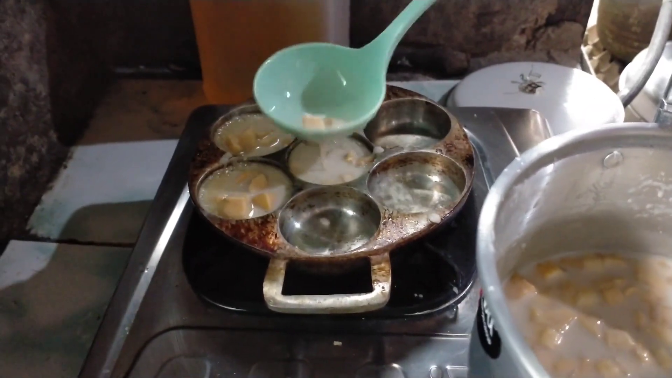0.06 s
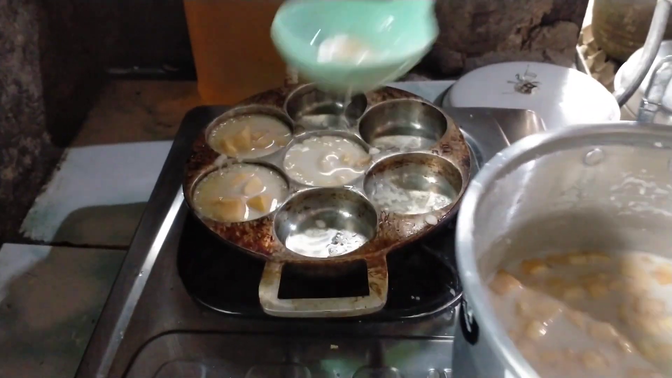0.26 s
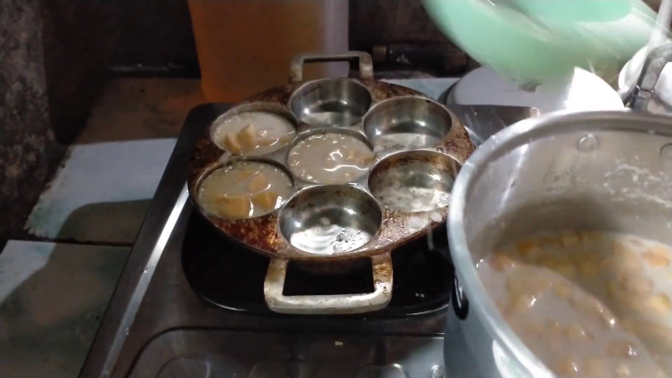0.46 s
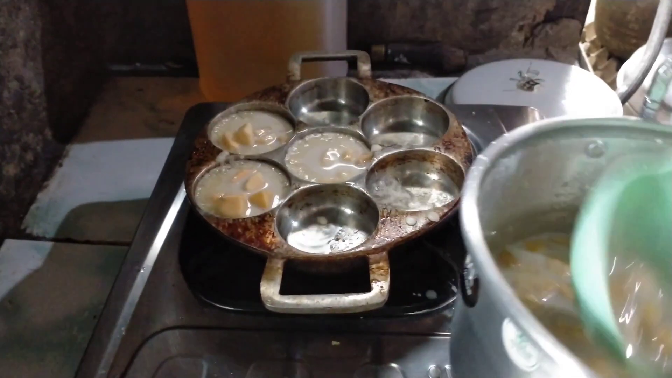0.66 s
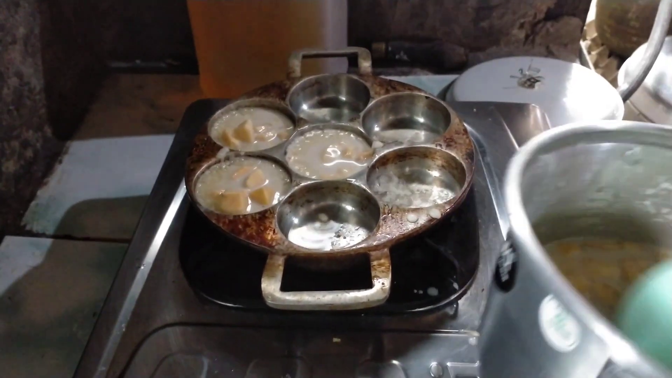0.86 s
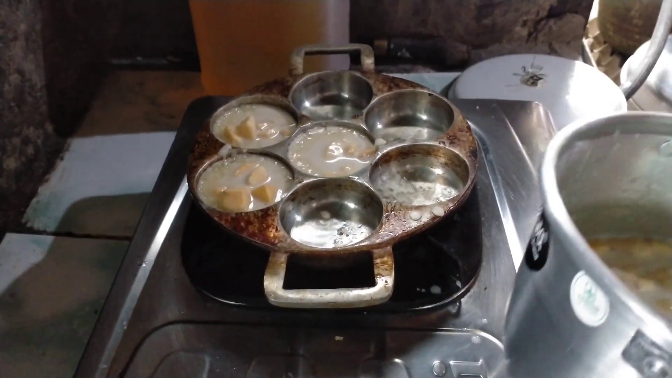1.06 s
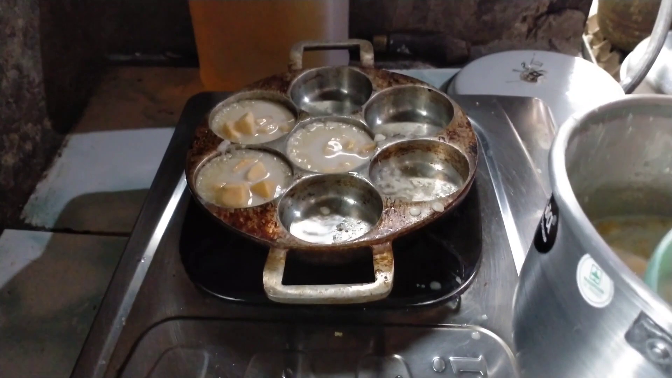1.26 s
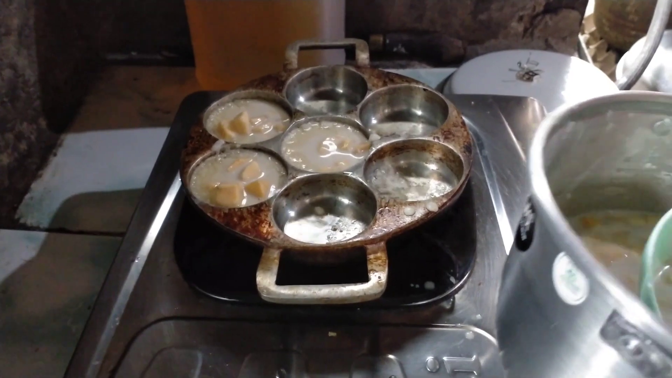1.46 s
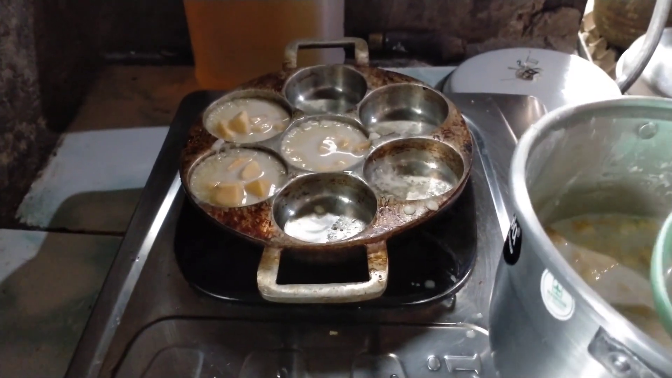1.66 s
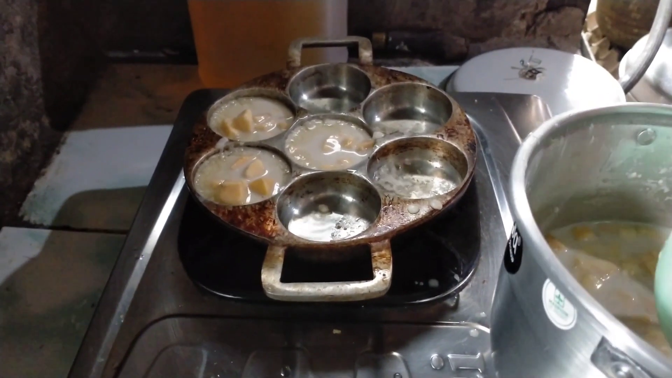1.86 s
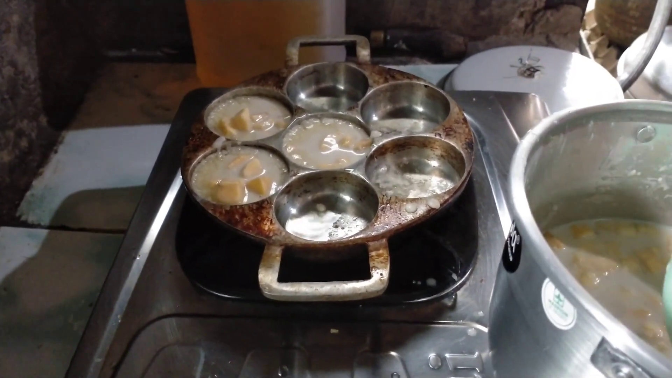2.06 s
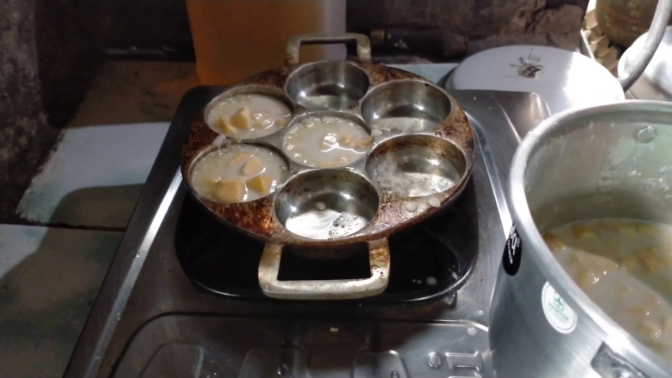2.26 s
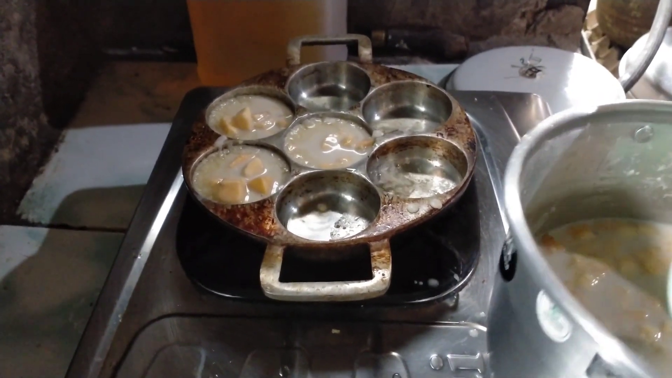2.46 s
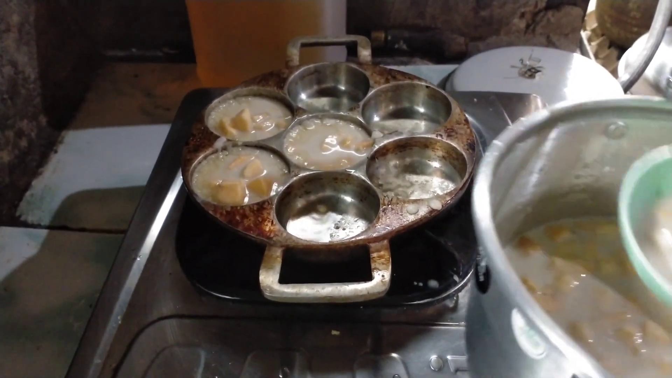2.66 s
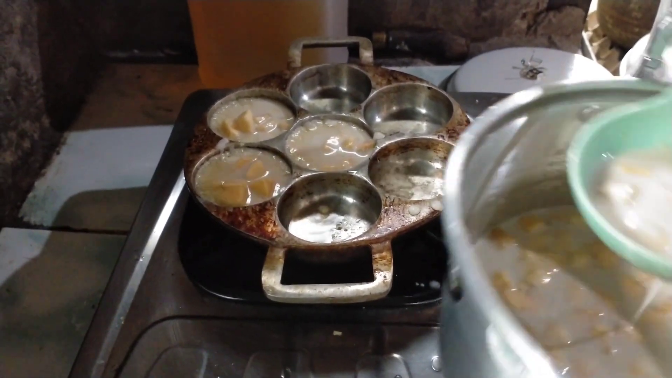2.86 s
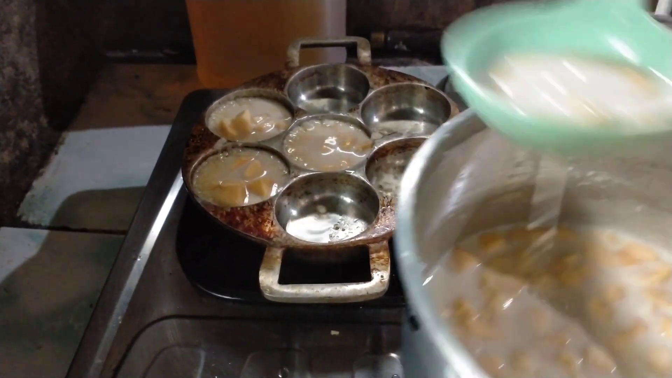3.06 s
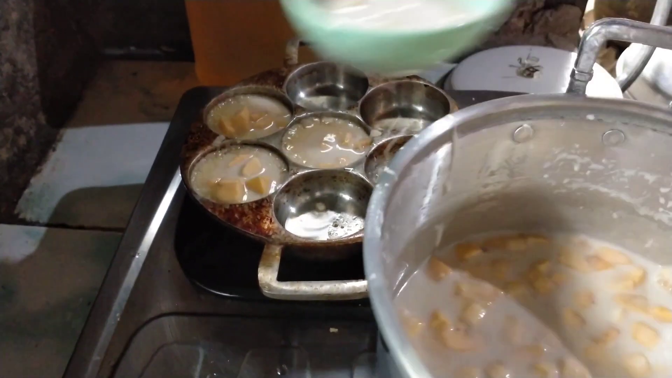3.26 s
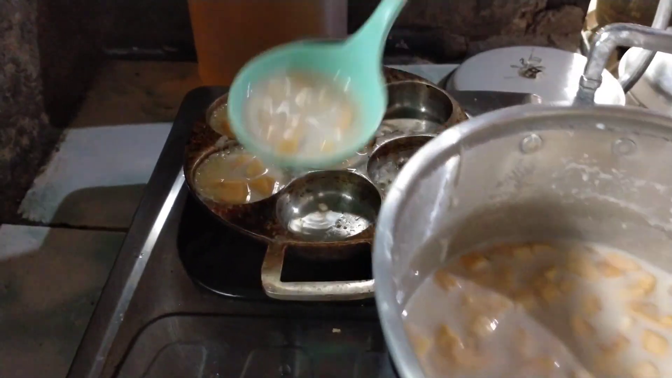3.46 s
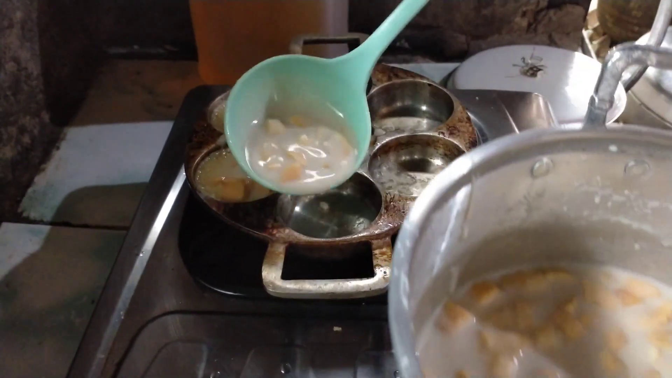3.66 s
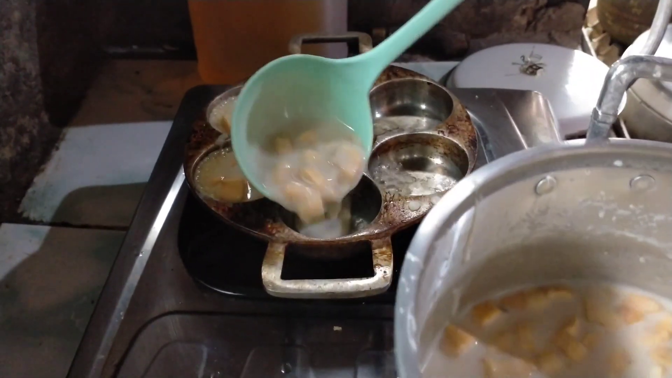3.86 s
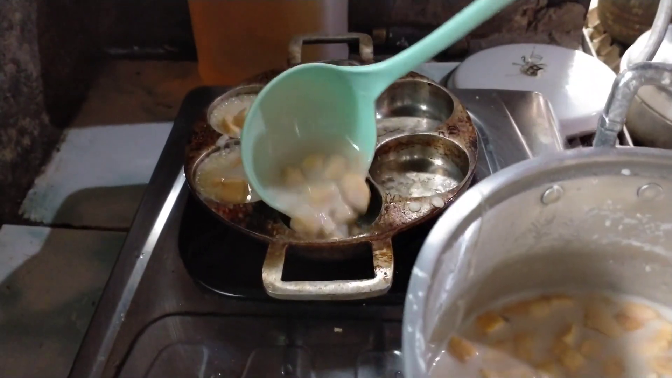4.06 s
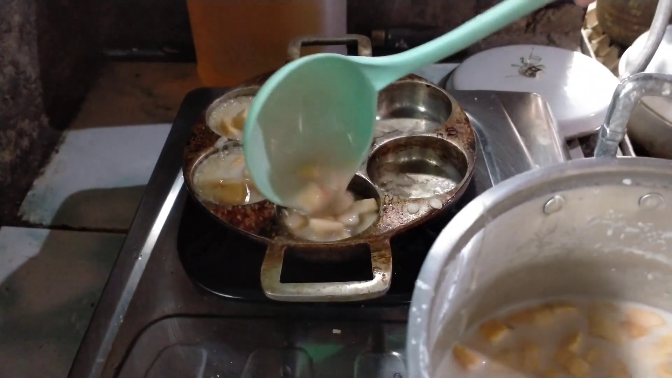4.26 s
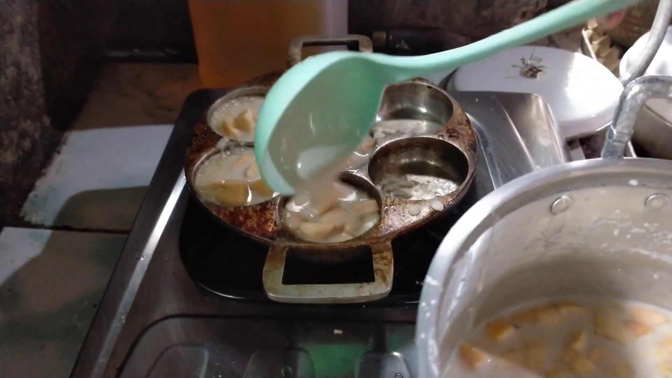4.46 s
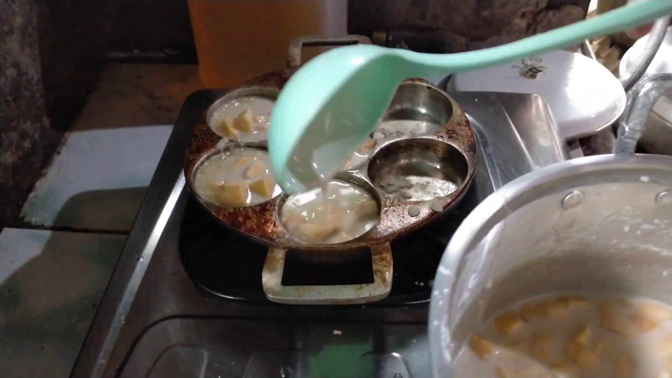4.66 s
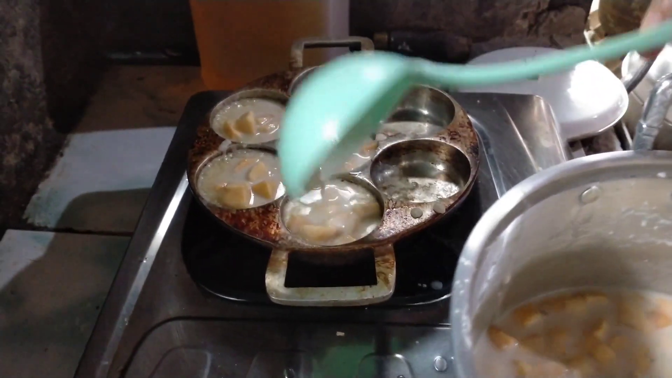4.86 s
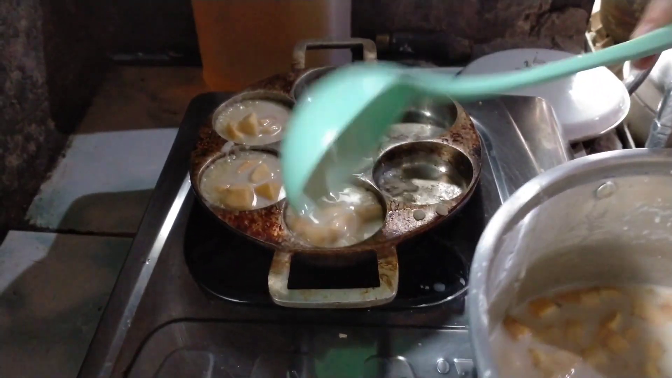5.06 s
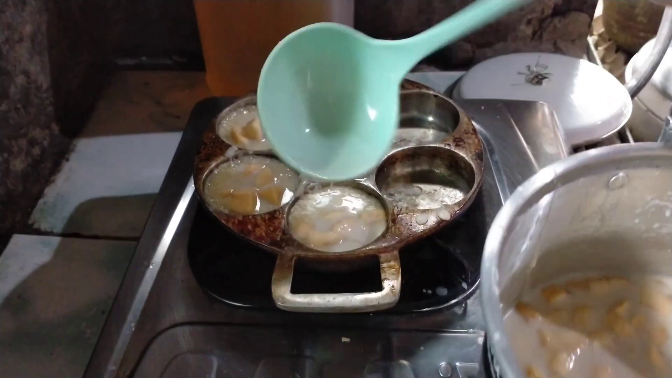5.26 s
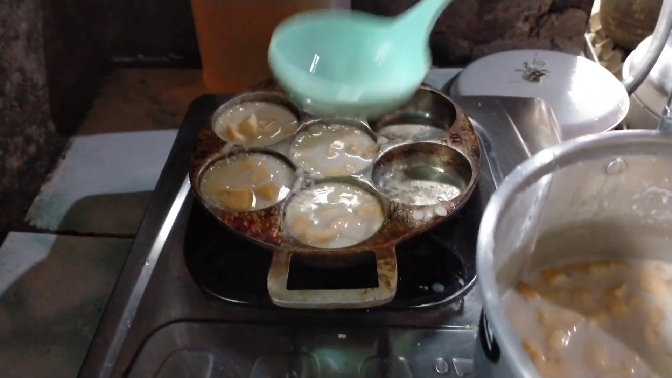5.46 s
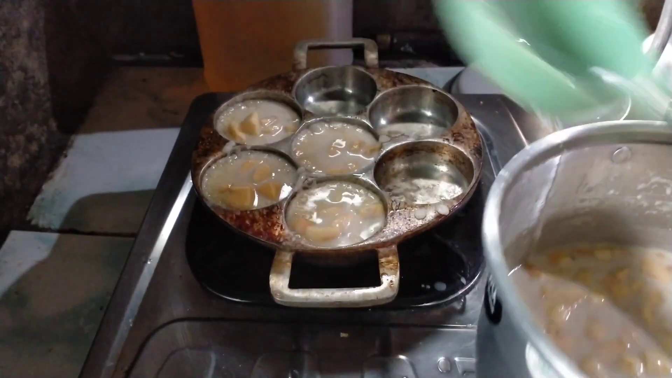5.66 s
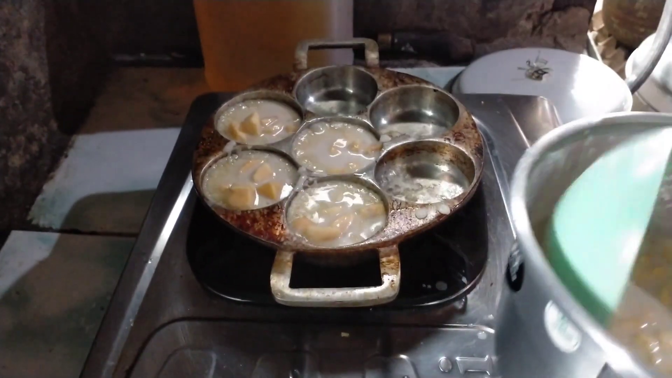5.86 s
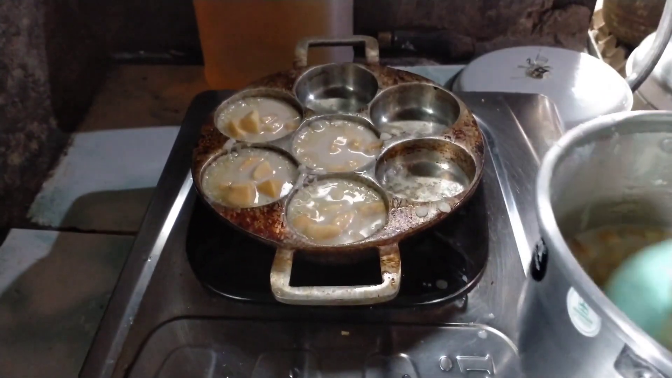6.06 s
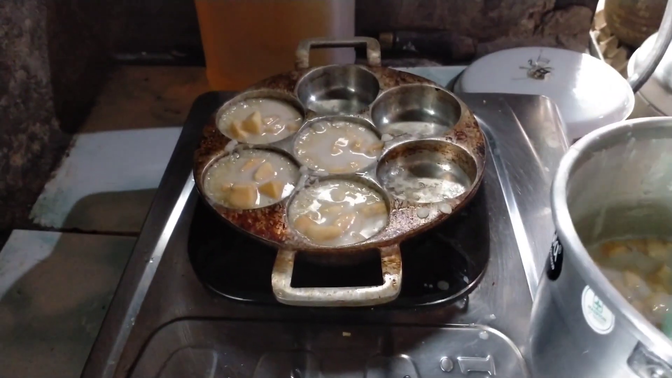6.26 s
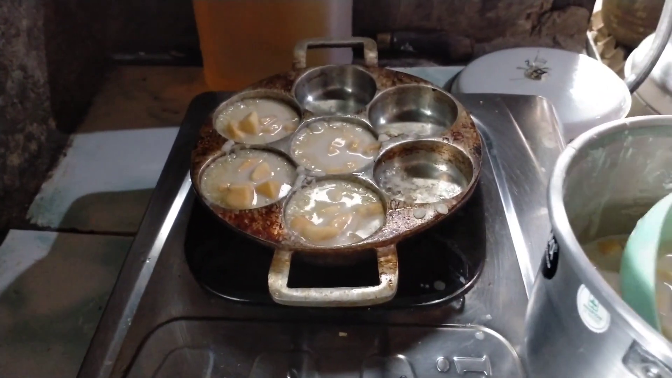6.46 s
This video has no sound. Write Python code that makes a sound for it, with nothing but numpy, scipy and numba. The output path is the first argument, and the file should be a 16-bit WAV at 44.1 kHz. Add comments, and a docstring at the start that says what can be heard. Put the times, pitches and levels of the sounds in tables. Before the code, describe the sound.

Bright frying hiss dies to scattered spits; a new pour sears loudly with a soft knock, bubbles hard, then settles in a kitchen.

```python
"""A kitchen, a little way from a mono microphone: batter is already frying in the oiled cups of a hot metal
mould, over a low rumble and a distant hum that swells once. Random steam bursts in flurries, filtered by bubble
size, make the sizzle; blisters pop as short rung noise, and among them single drops spit as clusters of clicks.
From 3.4 s new layers of frying set in; a ladle knocks (damped modes), a dollop slaps in, surges flash into steam.
From 4 s the filled front cup rings with its own bubbling, then settles as the frying dies down."""
import sys
import numpy as np
from scipy import signal
from scipy.fft import rfft, irfft
from scipy.io import wavfile
from numba import njit

SR = 44100
rng = np.random.default_rng(int(sys.argv[2]) if len(sys.argv) > 2 else 0)


def generate_wav(sig):
    """Save sig (samples, or channels by samples) to the path in sys.argv[1] as 16-bit PCM at SR."""
    pcm = np.round(np.clip(np.atleast_2d(sig).T, -1, 1) * 32767).astype(np.int16)
    wavfile.write(sys.argv[1], SR, pcm)


N = 287091
TIME = np.arange(N) / SR


def undb(db):
    """Decibels to amplitude."""
    return 10 ** (np.asarray(db) / 20)


def unit(x):
    """Scale to rms 1."""
    return x / np.sqrt(np.mean(x ** 2))


def add(out, s, sound):
    """Mix a short sound in at s seconds."""
    room = out[int(s * SR):][:len(sound)]
    room += sound[:len(room)]


def envelope(age, attack_s, hold_s, release_s):
    """Straight rise, level until hold_s after the start, then an exponential fall."""
    rise = np.clip(age / attack_s, 0, 1)
    return rise * np.exp(-np.maximum(age - hold_s, 0) / release_s)


def puff(rise_s, decay_s):
    """Envelope of one small explosion of steam."""
    age = np.arange(SR // 10) / SR
    return (1 - np.exp(-age / rise_s)) * np.exp(-age / decay_s)


def walk(rate):
    """Random wander of rms 1, heading for a new value rate times a second."""
    return unit(np.interp(TIME * rate, np.arange(2048), rng.standard_normal(size=2048)))


def colour(x, points, size=16384):
    """Minimum-phase filter with the given (Hz, dB) outline, falling 20 dB per octave outside it."""
    hz, db = np.transpose(points)
    bins = np.maximum(np.arange(size // 2 + 1) * SR / size, 1)
    octaves_below = np.maximum(np.log2(hz[0] / bins), 0)
    octaves_above = np.maximum(np.log2(bins / hz[-1]), 0)
    outline_db = np.interp(np.log(bins), np.log(hz), db) - 20 * (octaves_below + octaves_above)
    # folding the cepstrum forward in time makes the filter causal
    cepstrum = irfft(np.log(undb(outline_db)))
    cepstrum[1:size // 2] *= 2
    cepstrum[size // 2 + 1:] = 0
    impulse = irfft(np.exp(rfft(cepstrum)))
    return signal.fftconvolve(x, impulse)[:N]


def ring(x, hz, width_hz):
    """Fixed resonance, gain 1 at the centre."""
    return signal.lfilter(*signal.iirpeak(hz, hz / width_hz, fs=SR), x)


@njit
def resonance(x, hz, width):
    """State-variable band-pass whose centre may move."""
    y, band, low = np.empty(len(x)), 0., 0.
    for i in range(len(x)):
        g, damping = np.tan(np.pi * hz[i] / SR), width / hz[i]
        v = (band + g * (x[i] - low)) / (1 + g * (g + damping))
        band, low, y[i] = 2 * v - band, low + 2 * g * v, damping * v
    return y


def bursts(rate, spread_db):
    """Bubbles bursting at random, rate a second, with sizes spread in dB; rms 1."""
    chance, size = rng.random(N), rng.standard_normal(N)
    hit = np.flatnonzero(chance < rate / SR)
    out = np.zeros(N)
    out[hit] = (-1.) ** hit * undb(spread_db * np.minimum(size[hit], 2.6))
    return unit(out)


def flurries(rate, rise_s, decay_s):
    """Each drop that meets the oil sets off a flurry of bursts that dies quickly; mean power 1."""
    drops = rng.random(N) < rate / SR
    power = drops * (0.5 + np.minimum(rng.exponential(1, N), 3))
    for lag_s in rise_s, decay_s:
        power = signal.lfilter([1], [1, -np.exp(-1 / (lag_s * SR))], power)
    return power / power.mean()


# low rumble of the surroundings: (f/Hz, relative level/dB per Hz)
RUMBLE_SPECTRUM = [(8, 4.5), (25, 2.5), (40, -3.5), (62, -4), (85, -1.5), (112, -2), (150, -11), (220, -18),
                   (500, -31.5)]
RUMBLE_DB = -51.5
# distant hum: base level of its lower tone, swell on top, time of the peak and half length of the swell
HUM_DB, HUM_SWELL_DB, HUM_PEAK_S, HUM_SWELL_S = -61, 12, 1.22, 1.2


def surroundings():
    """Low rumble with a two-tone hum of narrow noise bands, which wavers, swells once and recedes."""
    def hum_tone(hz):
        """Noise narrowed to a wavering tone."""
        return unit(colour(rng.standard_normal(N), [(0.873 * hz, -35), (hz, 0), (1.2 * hz, -35)]))

    swell = np.exp(-((TIME - HUM_PEAK_S) / HUM_SWELL_S) ** 2)
    hum = undb(HUM_DB + HUM_SWELL_DB * swell) * (hum_tone(83) + undb(-7) * hum_tone(115))
    rumble = unit(colour(rng.standard_normal(N), RUMBLE_SPECTRUM))
    return hum + undb(RUMBLE_DB) * rumble


# overlapping layers of frying, the first two already fading at the start:
# (t/s, time to rise/s, bubbling level/dB, fine fizz level/dB, finest spray level/dB, fade of fizz and spray/dB per s)
# levels are those before fading, lulls and mixing
FRYING_LAYERS = [(-.1, .05, -31, -24.5, -27, 3), (-.1, .05, -31.5, -25, -22, 15),
                 (3.442, 0.012, -39, -32.5, -32, 1), (3.628, 0.0078, -37.5, -29, -27, 2.2),
                 (3.84, 0.2, -29, -28, -29, 2.5), (4.2, 0.03, -31, -21, -23, 6),
                 (4.47, 0.017, -48, -25, -36, 34)]
# brief lulls in the frying: (t of the middle/s, half length/s, depth/dB)
FRYING_LULLS = [(2.536, 0.032, 4), (3.197, 0.095, 1.5), (3.423, 0.018, 4.5), (6.385, 0.26, 2.5)]
# the bubbling outlasts the fizz: it fades by only this share as much
BUBBLE_FADE_SHARE = 0.88


def frying_levels():
    """Bubbling, fizz and spray in dB: overlapping layers add in power, each with its own start and fade."""
    power = 1e-9
    for s, rise_s, bubble_db, fizz_db, spray_db, fade_db_per_s in FRYING_LAYERS:
        risen = np.clip((TIME - s) / rise_s, 0, 1)
        fade_db = fade_db_per_s * np.maximum(TIME - s, 0)
        levels_db = [bubble_db - BUBBLE_FADE_SHARE * fade_db, fizz_db - fade_db, spray_db - fade_db]
        power = power + risen * undb(levels_db) ** 2
    lull_db = sum(db * np.exp(-((TIME - s) / half_s) ** 2) for s, half_s, db in FRYING_LULLS)
    return 10 * np.log10(power) - lull_db


# colours of the bursts in the cups, from the largest bubbles to the finest spray:
# (f/Hz, relative level/dB per Hz)
DEEP_SPECTRUM = [(180, -17), (250, -17.5), (303, -0.5), (345, -6.5), (420, -2), (520, -13.5), (615, 2),
                 (700, -2), (790, -1), (870, -1), (980, 0), (1120, -7.5), (1300, 2), (1700, -18.5)]
BUBBLE_SPECTRUM = [(900, -32.5), (1200, -13), (1400, -5), (1530, -10), (1850, 0), (2030, -3.5),
                   (2220, -1.5), (2400, 0), (2700, 0), (2900, -3), (3400, -5.5), (4000, -5), (4300, -19.5),
                   (5500, -31)]
FIZZ_SPECTRUM = [(3000, -33), (4350, -13.5), (4850, -10), (5600, -11), (6600, -8), (7300, -2), (8000, 0),
                 (8600, -4.5), (9200, -10), (11000, -16.5), (13000, -18)]
SPRAY_SPECTRUM = [(7000, -29), (9500, -11), (11000, -7), (12200, -7), (13300, -0.5), (14000, -6.5),
                  (14600, -2), (15800, -19)]


def sizzle():
    """Four sizes of bubble; as the frying calms, the even boil breaks up into separate flurries."""
    bubble_db, fizz_db, spray_db = frying_levels()
    sputter = np.clip(np.interp(fizz_db, [-30, -18], [.42, .2]), 0, 1)
    shared = flurries(rate=75, rise_s=.0012, decay_s=.006)

    def crackle(points, rate, spread_db, own_share):
        """Bursts of one size: they follow the common flurries and have some of their own."""
        own = flurries(rate=95, rise_s=0.0014, decay_s=0.0027)
        mixed = shared + own_share * (own - shared)
        power = 1 - sputter + sputter * mixed
        return unit(colour(bursts(rate, spread_db) * np.sqrt(power), points))

    deep = crackle(DEEP_SPECTRUM, rate=3000, spread_db=3.5, own_share=0.18)
    bubbles = crackle(BUBBLE_SPECTRUM, rate=7000, spread_db=3.0, own_share=0.7)
    fizz = crackle(FIZZ_SPECTRUM, rate=12000, spread_db=2.0, own_share=0.25)
    spray = crackle(SPRAY_SPECTRUM, rate=13000, spread_db=3.0, own_share=0.1)
    # once the front cup is filled it takes over part of the bubbling
    bubble_db = bubble_db + np.interp(TIME, [3.88, 4.1], [3.0, .2])
    boil = (bubbles + undb(-13.5) * deep) * undb(bubble_db)
    return fizz * undb(fizz_db) + spray * undb(spray_db) + boil


def steam(shape, hz, sag, width_hz, rate):
    """A rush of bursts of nearly one size, whose pitch sinks by sag octaves a second, an octave at most."""
    pitch = hz * 2 ** -np.clip(sag * np.arange(len(shape)) / SR, 0, 1)
    rush = bursts(rate, spread_db=2)[:len(shape)]
    for _ in range(2):
        rush = resonance(rush, pitch, float(width_hz))
    return unit(rush) * shape


# surges of batter reaching bare hot metal: (t/s, length/s, bubble pitch f/Hz, steam flash level/dB,
# hiss centre f/Hz, searing hiss level/dB, oil squirt level/dB)
BATTER_SURGES = [(0, 0.26, 3200, -30.5, 12600, -36, -36), (3.631, 0.22, 2340, -33.5, 12100, -29, -42),
                 (3.877, 0.062, 2200, -17, 10300, -24.5, -26.5),
                 (3.946, 0.038, 1420, -29.5, 10400, -44, -39), (3.986, 0.15, 2270, -24, 10600, -39, -33),
                 (4.18, 0.034, 3250, -24, 14300, -26, -28), (4.342, 0.051, 2940, -27.5, 14200, -22.5, -39)]
# steam follows the hiss after a moment; its bubbles grow, so their pitch sags
FLASH_LAG_S, FLASH_SAG_OCT_PER_S = .025, 0.58
# the first dollop slaps into the cup and falls in pitch as it flattens
PLOP_S, PLOP_HZ, PLOP_DB, PLOP_SAG_OCT_PER_S = 3.624, 590, -33.5, 13


def pour():
    """The batter slaps in; each surge sears on the metal, pushes the oil aside and boils up."""
    out, age = np.zeros(N), np.arange(SR) / SR
    slap = envelope(age, attack_s=0.016, hold_s=.032, release_s=.028)
    plop = steam(slap, PLOP_HZ, PLOP_SAG_OCT_PER_S, width_hz=640, rate=4500)
    add(out, PLOP_S, undb(PLOP_DB) * plop)
    for s, length_s, bubble_hz, flash_db, hiss_hz, sear_db, squirt_db in BATTER_SURGES:
        sear_shape = envelope(age, attack_s=0.005, hold_s=.5 * length_s, release_s=.08)
        sear = steam(sear_shape, hiss_hz, sag=0, width_hz=4500, rate=21000)
        add(out, s, undb(sear_db) * sear)
        squirt_shape = envelope(age, attack_s=0.0088, hold_s=.5 * length_s, release_s=0.15)
        squirt = steam(squirt_shape, hz=6300, sag=0, width_hz=2900, rate=4500)
        add(out, s, undb(squirt_db) * squirt)
        flash_shape = envelope(age, attack_s=.022, hold_s=length_s, release_s=0.05)
        flash = steam(flash_shape, bubble_hz, FLASH_SAG_OCT_PER_S, width_hz=940, rate=5000)
        add(out, s + FLASH_LAG_S, undb(flash_db) * flash)
    return out


# larger blisters that pop: (t/s, level/dB before the puff envelope, pitch f/Hz)
BLISTER_POPS = [(0.324, -13.5, 2800), (0.53, -18, 2230), (1.316, -25, 2640), (3.049, -27, 2300),
                (3.6342, -18, 2070), (5.239, -16, 3000), (5.3218, -18, 2170), (5.7093, -20, 2710)]


def pops():
    """A blister opens and rings its small cavity."""
    out, shape = np.zeros(N), puff(rise_s=0.0015, decay_s=0.0063)
    for s, db, hz in BLISTER_POPS:
        cavity = unit(ring(rng.standard_normal(len(shape)), hz, width_hz=320))
        add(out, s, undb(db) * shape * cavity)
    return out


# drops that spit: (t/s, fizz level/dB, finest spray level/dB), both before the puff envelope
SPITTING_DROPS = [(1.459, -16, -25), (1.589, -15.5, -30), (1.767, -22, -21), (1.834, -17, -15),
                  (1.972, -20, -23), (2.062, -16, -16), (2.212, -16.5, -33), (2.362, -15.5, -19),
                  (2.487, -20, -15.5), (2.51, -18, -31), (2.685, -16, -31), (2.906, -19, -31),
                  (4.614, -7, -20), (5.424, -13, -16), (5.842, -13.5, -15), (6.075, -18, -14),
                  (6.419, -22, -15)]


def spits():
    """A water drop boils off at once in a tight cluster of clicks."""
    fizz, spray, shape = np.zeros(N), np.zeros(N), puff(rise_s=0.0034, decay_s=0.0062)
    for s, fizz_db, spray_db in SPITTING_DROPS:
        add(fizz, s, undb(fizz_db) * shape)
        add(spray, s, undb(spray_db) * shape)
    clicks = bursts(rate=12000, spread_db=2)
    return fizz * unit(colour(clicks, FIZZ_SPECTRUM)) + spray * unit(colour(clicks, SPRAY_SPECTRUM))


# soft knocks of ladle and batter on the mould: (t/s, peak level/dB, contact time/s)
LADLE_KNOCKS = [(3.63, -24, .0003), (3.654, -25, 0.0018), (3.794, -30.5, 0.0026), (4.005, -41, 0.0034),
                (4.587, -31, 0.0022)]
# what the mould on its stove rings with: (f/Hz, relative level/dB, t60/s)
MOULD_MODES = [(157, -18, 0.14), (231, -15, .1), (270, -6, 0.14), (307, -2, 0.22), (359, -10, 0.24),
               (410, -13, 0.19), (496, -5, 0.041), (627, -2.5, 0.15), (730, -8, 0.11), (855, -8, 0.12),
               (1000, -15, .08)]


def knocks():
    """Dull blows ring the mould; a longer contact leaves only the lowest modes."""
    out, age = np.zeros(N), np.arange(SR // 3) / SR
    for s, db, contact_s in LADLE_KNOCKS:
        thud = 0
        for hz, mode_db, t60 in MOULD_MODES:
            softness = 1 / (1 + (hz * contact_s) ** 4)
            tone = np.sin(2 * np.pi * (hz * age + rng.random()))
            thud = thud + softness * undb(mode_db - 60 * age / t60) * tone
        thud = thud * (1 - np.exp(-age / (0.004 + 5 * contact_s)))
        add(out, s, undb(db) * thud / np.abs(thud).max())
    return out


# resonances of the front cup: (f/Hz, width/Hz, relative level/dB)
CUP_RESONANCES = [(295, 35, -2.5), (638, 36, -4.5), (825, 120, -15.5), (994, 78, -4), (1360, 210, -7),
                  (1846, 93, -5), (2230, 55, 3.5), (2626, 140, 0), (2960, 64, 1.5), (3254, 70, 0.5),
                  (3490, 37, -1), (3730, 100, -11)]
# the bursts that drive the front cup: (f/Hz, relative level/dB per Hz)
CUP_DRIVE_SPECTRUM = [(230, -10.5), (550, 0), (3900, 1), (4300, -42), (6000, -5)]
# the freshly filled front cup bubbles hard for a while, then settles
FRONT_START_S, FRONT_DB, FRONT_SETTLED_DB = 3.977, -28.5, -33.5
# big bubbles take longest to grow, so the lowest resonance comes in last, full this long after the start
GROWTH_S = 0.88


def front_cup():
    """Bursts ring the filled cup; as they wander over it, its resonances take turns."""
    age = TIME - FRONT_START_S
    boil = undb(FRONT_DB) * envelope(age, attack_s=0.052, hold_s=1.13, release_s=0.22)
    simmer = undb(FRONT_SETTLED_DB) * envelope(age, attack_s=0.11, hold_s=1.94, release_s=1.4)
    drive = colour(bursts(rate=3000, spread_db=3), CUP_DRIVE_SPECTRUM)
    lowest_hz = CUP_RESONANCES[0][0]
    ringing = 0
    for hz, width_hz, db in CUP_RESONANCES:
        grown = np.clip(age / (GROWTH_S * (lowest_hz / hz) ** 2), 0, 1) ** 3
        wandering = undb(db + 2.1 * walk(rate=34))
        ringing = ringing + grown * wandering * ring(drive, hz, width_hz)
    return np.hypot(boil, simmer) * ringing / ringing[age > 0].std()


def kitchen(x, t60_s, wet_db):
    """The stove top and close walls smear every burst with a short tail."""
    age = np.arange(SR // 2) / SR
    tail = rng.standard_normal(len(age)) * np.exp(-np.log(1000) * age / t60_s) * (age > .002)
    tail *= undb(wet_db) / np.sqrt(np.sum(tail ** 2))
    wet = signal.fftconvolve(x, tail)[:N]
    return (x + wet) / np.sqrt(1 + undb(wet_db) ** 2)


def scene():
    """Frying smeared by the kitchen, with dry knocks and surroundings, the same in both channels."""
    frying = kitchen(sizzle() + pour() + pops() + spits() + front_cup(), t60_s=0.15, wet_db=-10)
    return np.tile(surroundings() + frying + knocks(), (2, 1))


TOP_HZ = 15750


def record(dry):
    """The recorder cuts the top steeply."""
    return signal.sosfilt(signal.ellip(12, .2, 80, TOP_HZ, fs=SR, output="sos"), dry)


dry = scene()
out = record(dry)
generate_wav(out)
```